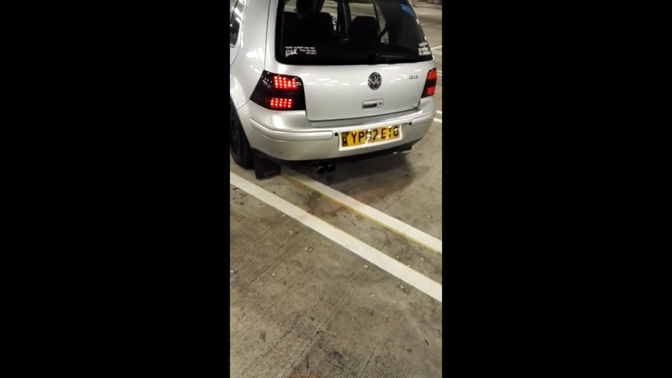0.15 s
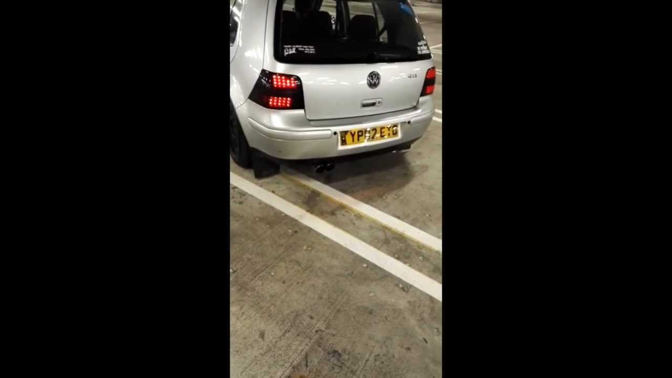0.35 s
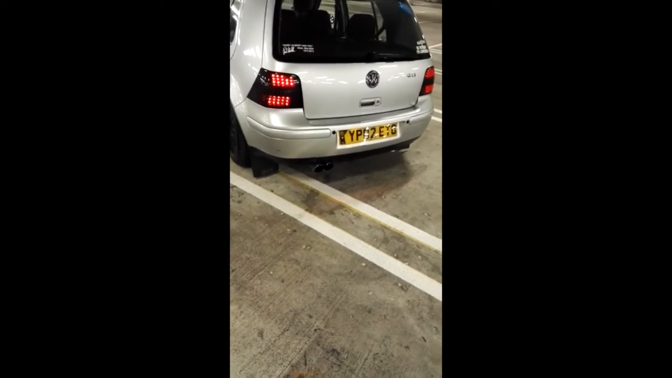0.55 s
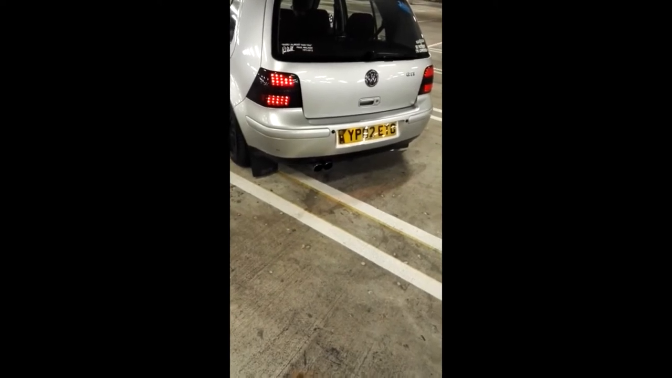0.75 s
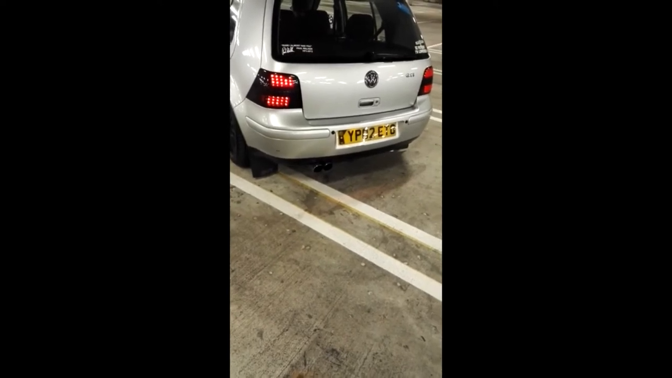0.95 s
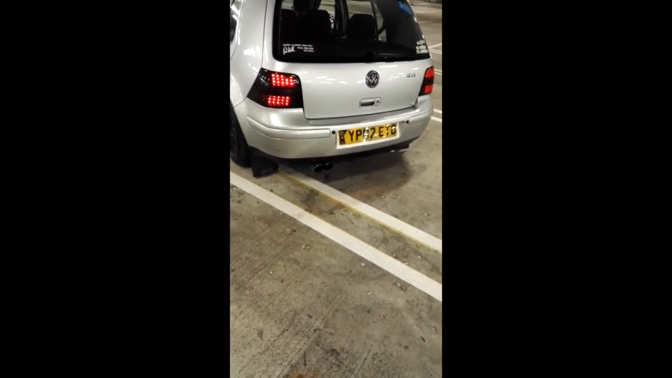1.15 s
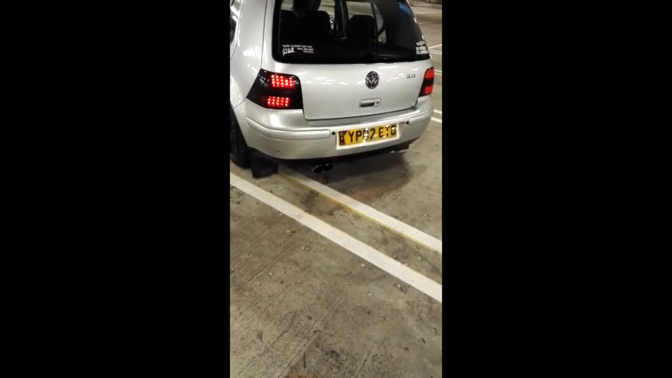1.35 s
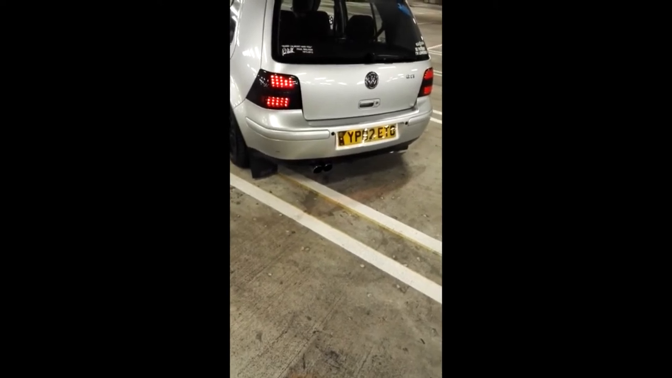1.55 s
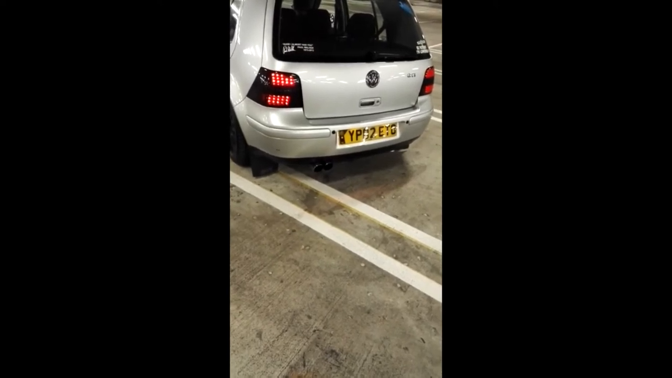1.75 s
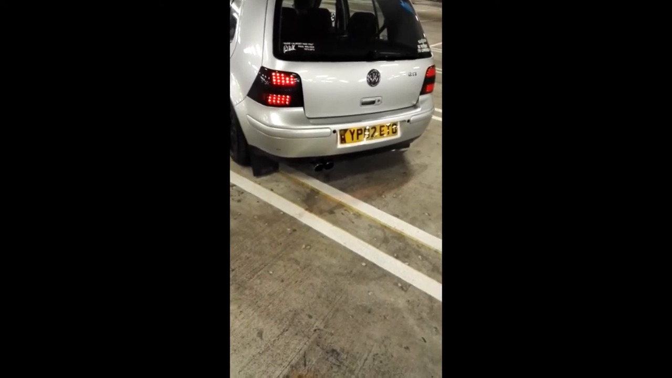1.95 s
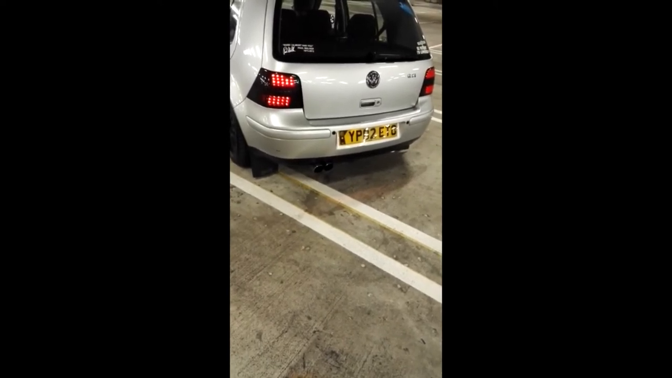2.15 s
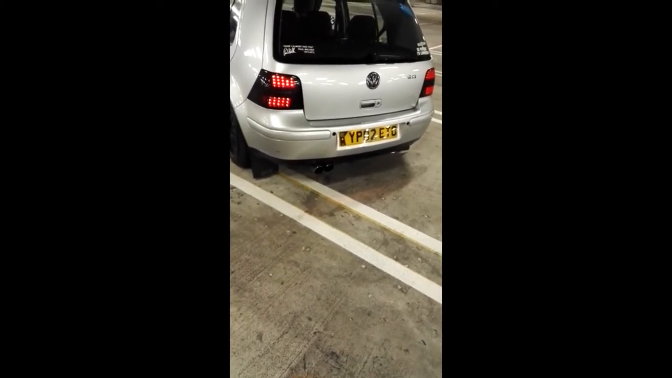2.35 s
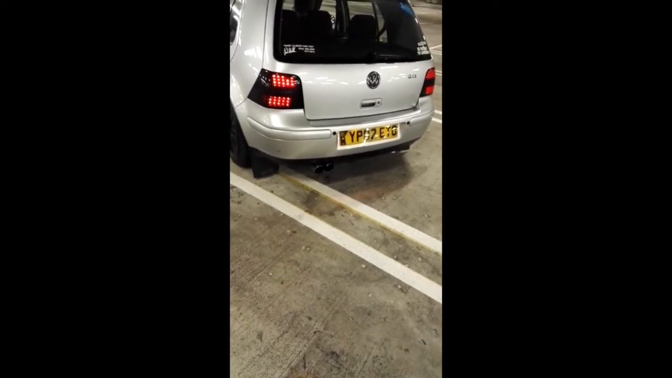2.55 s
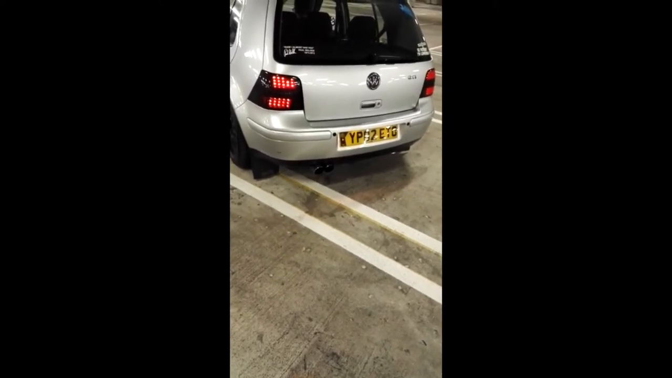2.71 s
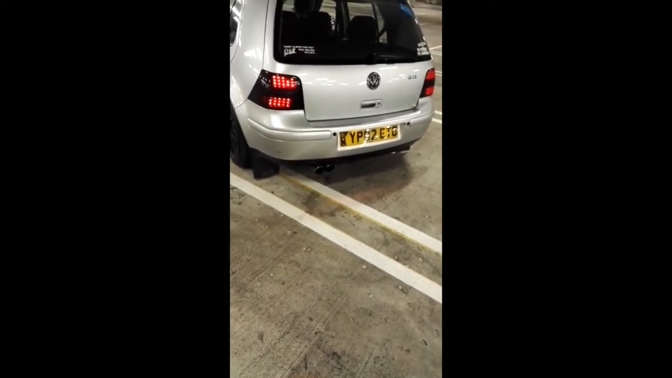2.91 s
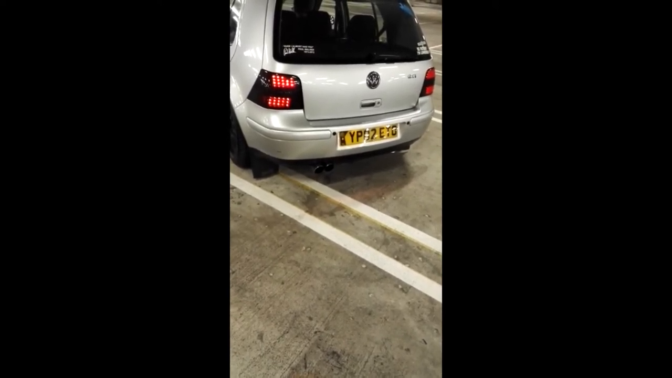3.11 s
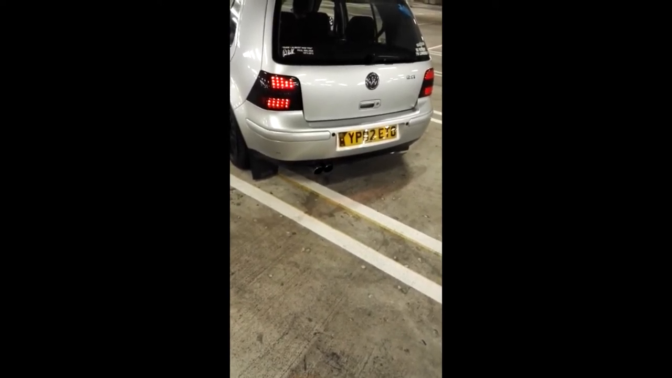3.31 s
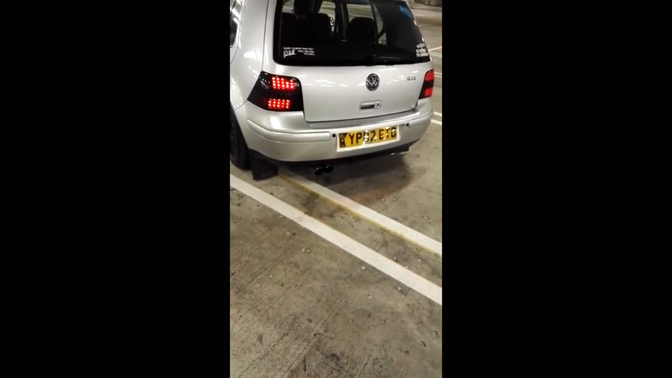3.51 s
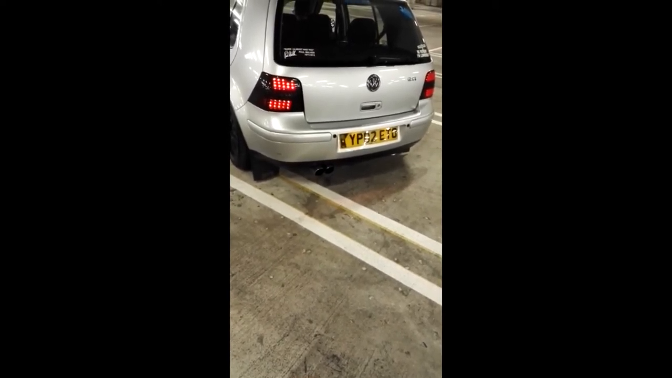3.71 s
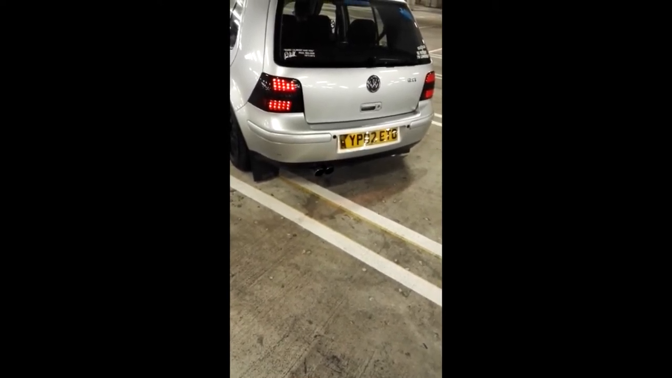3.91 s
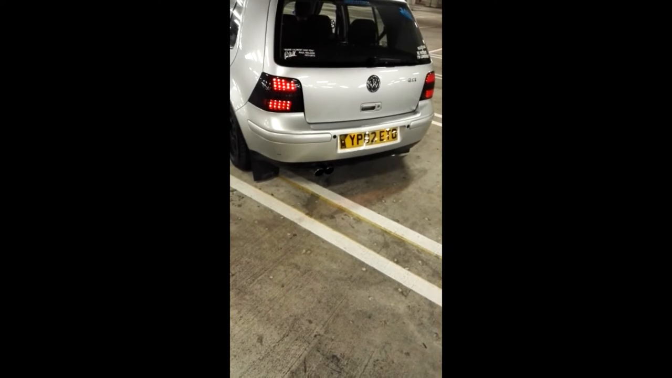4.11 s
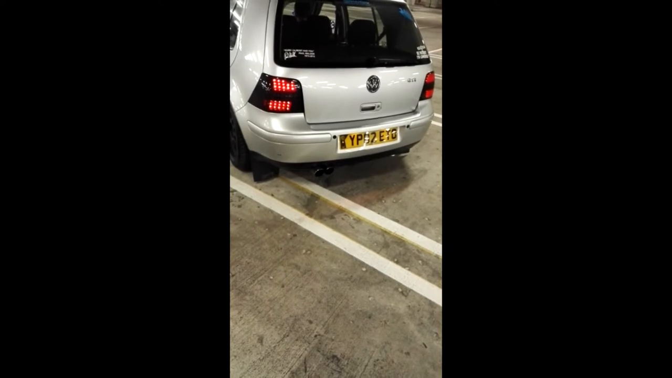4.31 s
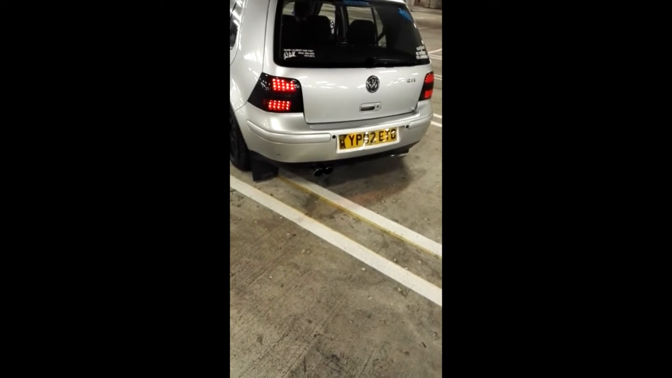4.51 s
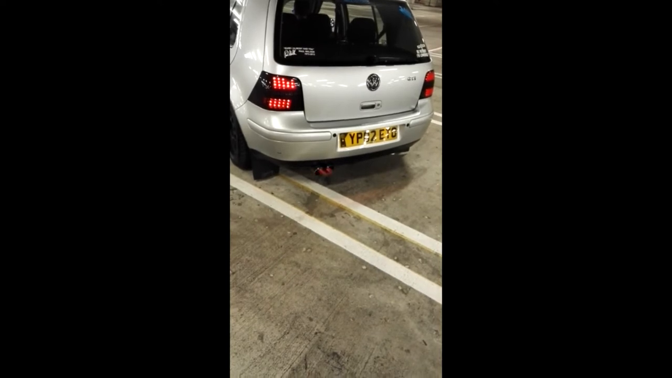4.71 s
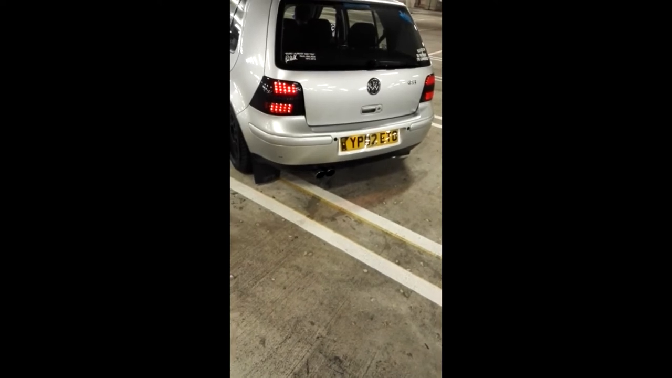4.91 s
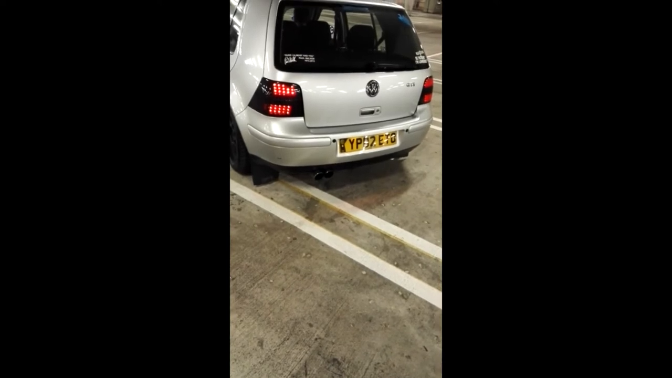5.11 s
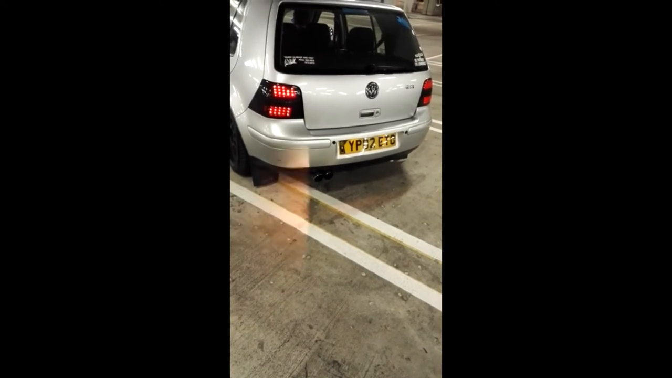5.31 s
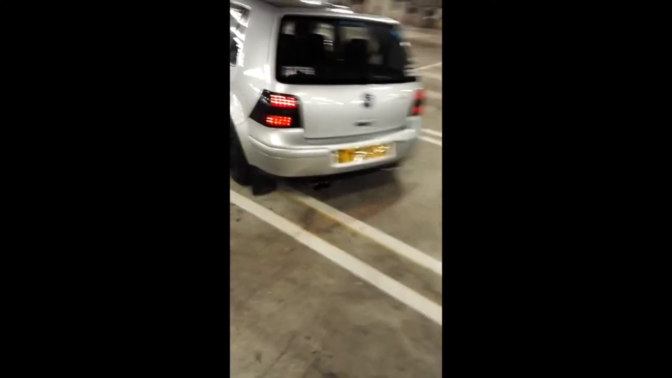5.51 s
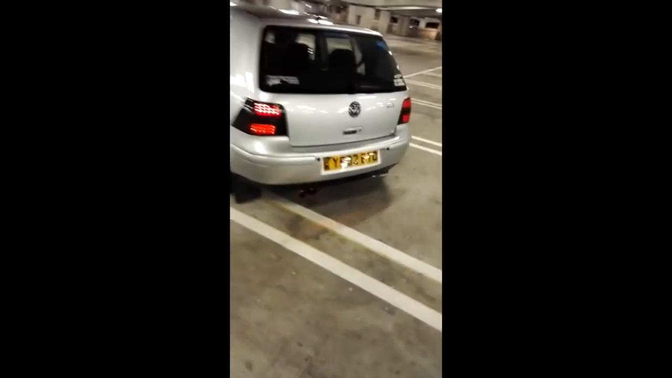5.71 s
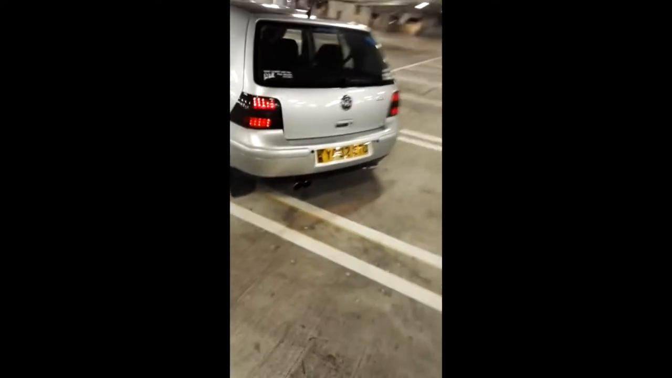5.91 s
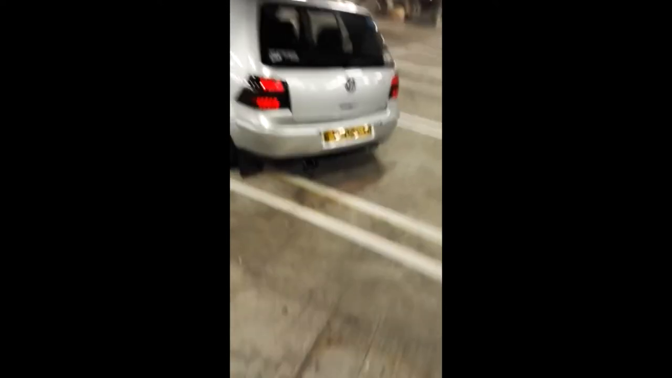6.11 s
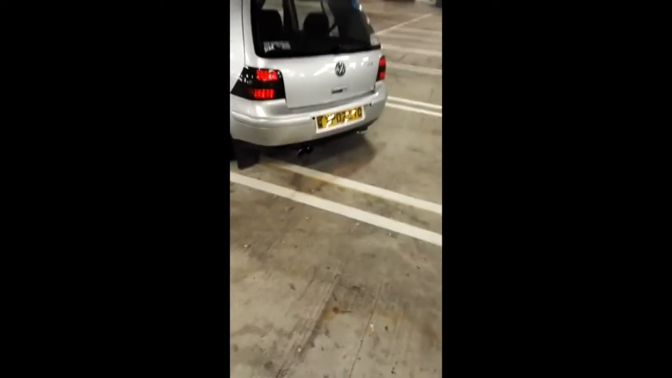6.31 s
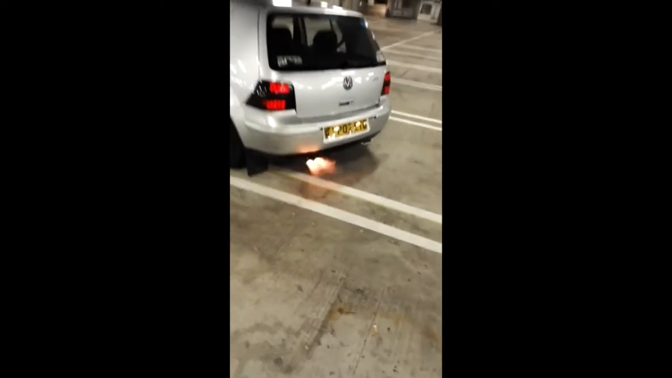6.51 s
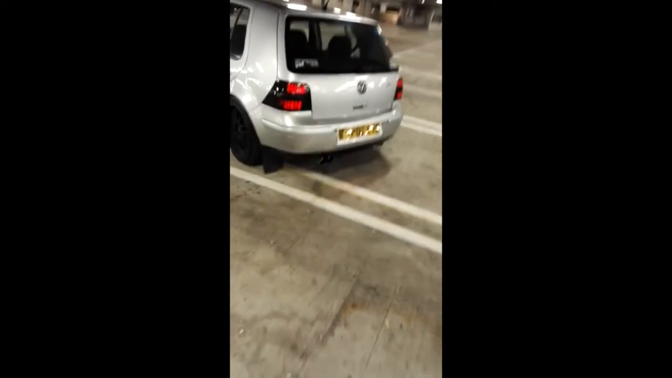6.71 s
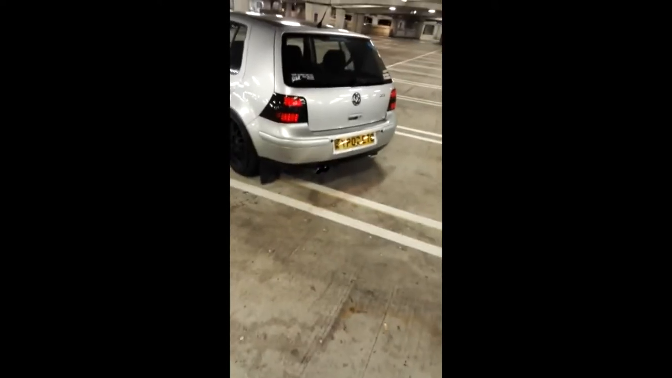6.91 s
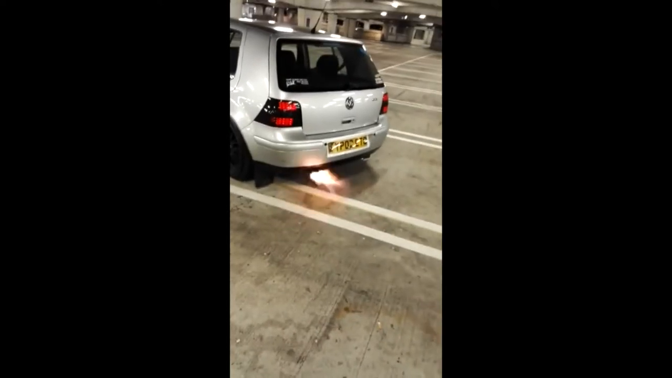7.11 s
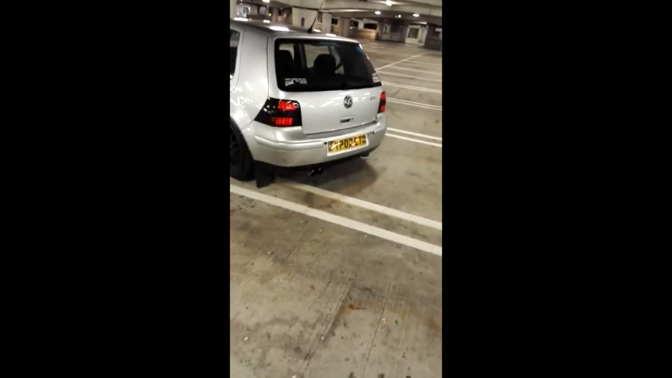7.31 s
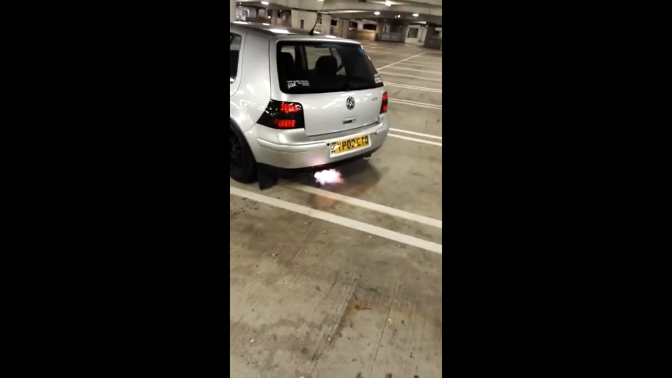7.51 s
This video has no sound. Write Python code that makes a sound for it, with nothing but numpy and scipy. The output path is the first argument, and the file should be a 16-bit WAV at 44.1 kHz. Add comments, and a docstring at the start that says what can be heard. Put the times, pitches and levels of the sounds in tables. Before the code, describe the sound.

Heard from close by in an echoing parking garage, a car engine climbs briefly and stutters at held revs for about four seconds, with a breathy turbo whistle and a few muffled pops. Then the engine drops back and the tailpipe fires sharp, crackling bangs: one alone, a rapid string, then two pairs. They distort the microphone and ring around the concrete walls while the engine surges weakly underneath.

```python
"""Launch limiter and backfires in a concrete car park.

A standing turbocharged four-cylinder car revs up against its launch limiter. Periodic firings make
the exhaust drone, and the limiter chops it into throbs, while turbulent gas roars and the turbo
whistles. Then the throttle closes and unburnt fuel explodes in the tailpipe: volleys of bangs
overload the microphone and reverberate round the hall."""
import sys
import numpy as np
from scipy import signal
from scipy.fft import rfft, irfft
from scipy.io import wavfile
from scipy.ndimage import uniform_filter1d

SR = 44100
rng = np.random.default_rng(int(sys.argv[2]) if len(sys.argv) > 2 else 0)


def waveform_to_disk(signal):
    """Save audio, clipped to [-1, 1], as 16-bit WAV at the path in sys.argv[1]."""
    frames = np.transpose(np.atleast_2d(signal))
    scaled = np.clip(frames, -1, 1) * 32767
    samples = np.round(scaled).astype(np.int16)
    wavfile.write(sys.argv[1], SR, samples)


N = 332980
TIME = np.arange(N) / SR
LIMITER_S, LIFT_S = 0.71, 4.7  # the limiter cuts in; the foot comes off the throttle

# Bursts in which the limiter lets the cylinders fire. Each row: start in seconds, length in seconds.
BURSTS = [(0.804, 0.055), (.896, 0.043), (0.988, 0.038), (1.096, .05), (1.249, .04), (1.327, 0.057),
          (1.521, 0.046), (1.704, .038), (1.899, 0.048), (2.085, 0.061), (2.187, 0.039), (2.275, 0.058),
          (2.365, .06), (2.49, 0.069), (2.607, 0.055), (2.695, 0.066), (2.815, 0.059), (2.933, 0.066),
          (3.051, 0.041), (3.135, 0.064), (3.26, 0.053), (3.351, 0.047), (3.456, 0.068), (3.572, .072),
          (3.667, 0.05), (3.783, 0.062), (3.897, .076), (3.994, .03), (4.048, 0.057), (4.132, 0.055),
          (4.216, .056), (4.285, 0.047), (4.411, 0.051), (4.514, .038), (4.634, 0.058)]
# Engine load, which drives drone, roar, hiss and turbo. Each row: time in seconds, load in dB.
ENGINE_LOAD = [(0, -3.5), (.8, 0), (1.3, -0.5), (1.87, -2.5), (2.35, 0), (2.53, -1.7), (2.88, -0.7),
               (3.15, -3), (3.65, -3.5), (4.17, -3.5), (4.5, -5)]
# Pitch of the turbo. Each row: time in seconds, whistle frequency in Hz.
TURBO_PITCH = [(0, 6550), (.35, 7000), (.75, 7300), (1.4, 8200), (2.05, 7060), (2.34, 9600), (2.7, 10300),
               (4.2, 10900)]
# The engine hunts after the lift. Each row: time in seconds, top firing rate in Hz, drone level in dB.
ENGINE_SURGES = [(4.83, 134, -21.5), (5.298, 138, -25), (6.421, 134, -29), (7.2, 136, -38)]
# Explosions in the tailpipe. Each row: start in seconds, crack in dB, burn time in seconds, boom in dB.
EXPLOSIONS = [(4.7834, -4.5, 0.037, -8.5), (5.4148, -4.5, 0.036, -18), (5.519, -13.5, 0.031, -43),
              (5.568, -13.5, 0.013, -33), (5.619, -12, .011, -23), (5.6921, -12, 0.021, -36),
              (5.759, -11.5, 0.029, -25), (6.4849, -12, 0.05, -37), (6.6041, -12.5, 0.06, -43),
              (7.2091, -11.5, 0.052, -31), (7.28, -22, 0.018, -31)]


def exhaust(turns, level, gate):
    """Periodic firings radiate a harmonic series; their unequal strengths add rumble and hum."""
    # Overtones. Each row: multiple of the firing rate, relative dB on the run-up and on the limiter.
    orders = [(.5, -32, -28), (1.5, -18, -18), (2, -15.5, -25), (2.5, -17.5, -29), (3, -23.5, -39),
              (4, -28.5, -38), (5, -27.5, -35.5), (6, -32.5, -37), (6.5, -33, -38), (7, -39, -45),
              (9.5, -32, -50.5), (10, -44, -40.5)]
    # Spectrum of the uneven firings. Each row: frequency in Hz, level in dB.
    rumble_spectrum = [(20, -12), (45, -12.5), (80, 6.5), (110, 9.5), (160, -1), (230, -3.5), (285, -10),
                       (400, -22), (700, -25), (2000, -74)]
    # A resonance that swells an overtone sweeping through it: centre in Hz, width in Hz, lift in dB.
    bark = (632, 30, 8)
    limiting, firing_hz = on_limiter(), engine_speed()
    # the faster the limiter chops, the more uneven the firings
    uneven_db = limiting * 12 * (np.minimum(uniform_filter1d(gate, size=6000), .55) - .55)
    # the walls carry the overtones on through the cuts
    carried = uniform_filter1d(level, size=5000) * gain_of(uneven_db)
    tone = level * np.sin(2 * np.pi * turns) * np.ones((2, 1))
    for order, free_db, limited_db in orders:
        # reflections part the phases of the two sides more as the pitch rises
        phase = rng.random() + 0.026 * order * rng.standard_normal((2, 1)) + 0.12 * wobble(18)
        db = free_db + limiting * (limited_db - free_db) + 2.8 * wobble(14)
        db += peak_db(order * firing_hz, *bark)
        tone += carried * gain_of(db) * np.sin(2 * np.pi * (order * turns + phase))
    firings = (np.diff(np.floor(turns), prepend=0) > 0) * rng.standard_normal(N)
    colour = gain_of(spectrum_at(rumble_spectrum, np.fft.rfftfreq(N, 1 / SR)))
    rumble = level * gain_of(-21.5 + limiting * (6 + 2 * gate)) * unit_rms(irfft(rfft(firings) * colour))
    hum = carried * gain_of(-18 - 9.2 * limiting) * narrow_band(firings, hz=283, width_hz=29)
    return np.sqrt(2) * tone + rumble + hum


def limiter(ramp_s=.016, dip_s=0.0095, dip_db=-5):
    """Interrupted firing modulates the amplitude. Returns the burst gate (0-1) and the drone envelope."""
    # Drone on the run-up. Each row: time in seconds, level in dB.
    run_up = [(.28, -17), (.38, -21), (.45, -15.5), (.52, -20.5), (.62, -15.5), (.78, -12.5)]
    gate = sum(np.clip(np.minimum(TIME - s, s + length - TIME) / ramp_s + .5, 0, 1)
               for s, length in BURSTS)
    burst_db = -8 + 1.04 * follow(ENGINE_LOAD)
    # a cut is deeper among crowded bursts, and deepest just before the cylinders fire again
    duty = uniform_filter1d(gate, size=12000)
    about_to_fire = np.interp(TIME + dip_s, TIME, gate)
    cut_db = burst_db - 4.5 - 4 * duty + dip_db * about_to_fire
    base_db = np.select([TIME < BURSTS[0][0], TIME < LIFT_S], [follow(run_up), cut_db], coasting_db())
    level = gain_of(base_db) + gate * (gain_of(burst_db) - gain_of(base_db))
    return uniform_filter1d(gate, size=200), uniform_filter1d(level, size=200)


def crank(gate, swing=.022, lag_cycles=.055, inertia_s=.06):
    """Phase, counted in firings, is the integral of a rate that rises in bursts and sags in cuts."""
    gained = signal.lfilter([1], [1, -np.exp(-1 / (inertia_s * SR))], gate) / (0.028 * SR)
    ripple = gained - uniform_filter1d(gained, size=9000)
    hz = engine_speed() * (1 + swing * ripple + .004 * wobble(50))
    return np.cumsum(hz) / SR - lag_cycles * gate  # fired pulses arrive later than unfired ones


def engine_speed(start_hz=113.3, limit_hz=132.83, climb_s=.8, lowest_hz=123):
    """The firing rate sets the fundamental: it eases up to the limit, then hunts after the lift."""
    held = limit_hz - (limit_hz - start_hz) * np.maximum(1 - TIME / climb_s, 0) ** 1.3
    times, top_hz, _ = np.transpose(ENGINE_SURGES)
    hunting = surge_curve(times, top_hz, rise_per_s=95, sag_per_s=30, floor=lowest_hz)
    return np.where(TIME < times[0], held, hunting)


def coasting_db(choke_db=-14, choke_s=.3):
    """Envelope of the drone after the lift: surges swell it, and bangs in close succession choke it."""
    times, _, top_db = np.transpose(ENGINE_SURGES)
    swell_db = surge_curve(times, top_db, rise_per_s=77, sag_per_s=29, floor=-33)
    choked = sum((TIME > s) * np.exp(-np.abs(TIME - s) / choke_s) for s, *_ in EXPLOSIONS)
    return swell_db + choke_db * np.clip(choked - 1, 0, 1)


def surge_curve(times, tops, rise_per_s, sag_per_s, floor):
    """Hunting is a slow oscillation: a quick linear rise to each top, then a gentler sag."""
    past = TIME - times[:, None]
    peaks = tops[:, None] - np.maximum(sag_per_s * past, -rise_per_s * past)
    return np.maximum(peaks.max(0), floor)


def on_limiter(fade_s=0.29):
    """Linear transition between regimes: 0 on the run-up, 1 on the limiter."""
    return np.clip((TIME - LIMITER_S) / fade_s + .5, 0, 1)


def backfires(refill_s=0.2, punch_s=0.04, body_rise_s=0.018, body_t60=0.49, boom_s=0.035):
    """Sudden combustion radiates a shock, a crackling flame, a hollow body and a boom; the hall echoes."""
    # Spectra of the flame's crack, the body and the boom. Each row: frequency in Hz, level in dB.
    crack_spectrum = [(30, -2.5), (200, -1), (700, -0.5), (1500, 1), (3000, 1.5), (6000, -2), (8500, -2),
                      (11000, -0.5), (13000, -1), (14500, -16.5)]
    body_spectrum = [(30, -17), (100, -26), (280, -4.5), (450, 3.5), (650, -1.5), (900, 1), (1100, -2),
                     (1400, -1), (2000, -2), (3300, -3.5), (5000, -15), (8000, -8.5), (14000, -15)]
    boom_spectrum = [(25, 0), (60, -15), (130, 0.5), (200, -3), (290, -3), (400, -7), (550, -14),
                     (900, -26), (4000, -60)]
    out, t = np.zeros((2, N)), TIME[:SR]
    waits = np.diff([row[0] for row in EXPLOSIONS], prepend=0)
    for (s, crack_db, burn_s, boom_db), wait_s in zip(EXPLOSIONS, waits):
        ring = 0.71 + 2.9 * gain_of(boom_db)  # a heavier boom rings the tailpipe harder
        after_burn = np.maximum(t - burn_s, 0)
        flame_db = 3 * np.exp(-t / punch_s) - 35 * t - 60 * after_burn / 0.45 - .7
        crackling = turbulence(crack_spectrum, SR, pipe=ring) * gain_of(flame_db + 1.5 * wobble(503)[:SR])
        body_db = -14 - 10.5 * np.exp(-wait_s / refill_s)  # fuel collects in the pipe between bangs
        decay_db = -60 * np.maximum(after_burn - .015, 0) / body_t60
        body = turbulence(body_spectrum, SR, pipe=ring) * gain_of(body_db + decay_db)
        body *= 1 - np.exp(-t / body_rise_s)
        boom = gain_of(boom_db) * turbulence(boom_spectrum, SR, pipe=0.9) * swell(t, boom_s)
        crack = gain_of(crack_db) * (crackling + gain_of(5) * shock(SR))
        add(out, s, near_reflections(crack + body + boom))
        # the echo grows with the crack, and by 4 dB per doubling of the burn time
        hall_db = -13 + 0.33 * crack_db + 4 * np.log2(burn_s / 0.053)
        add(out, s, gain_of(hall_db) * hall())
    return out


def shock(size, width_s=0.00045, spread_s=0.061, count=14):
    """A blast wave, compression then rarefaction, and its reflections off floor, ceiling and pillars."""
    t, taps = TIME[:600], np.zeros((2, size))
    front = (1 - t / width_s) * np.exp(-t / width_s)
    path_s = np.append(0, rng.uniform(0.0017, spread_s, count))
    arrival_s = path_s + rng.uniform(0, 0.00061, (2, count + 1))  # each side has its own delay
    strength = np.exp(-arrival_s / spread_s) * np.append(1, rng.uniform(.3, 1, count))
    np.put_along_axis(taps, (arrival_s * SR).astype(int), strength, axis=1)
    return signal.fftconvolve(taps, front[None], axes=1)[:, :size]


def gas_rush(turns, gate):
    """Turbulent outflow roars and hisses, pulsing with firings and bursts; it fades as the bangs start."""
    # Spectra of the roar and the hiss. Each row: frequency in Hz, level in dB.
    roar_spectrum = [(180, -37), (300, -2.5), (340, -5.5), (362, -10.5), (426, -3), (495, -7), (678, -10),
                     (1130, -14.5), (1670, -15.5), (1940, -14.5), (6000, -30.5), (7800, -33), (13200, -120)]
    hiss_spectrum = [(2500, -5.5), (4000, -5), (4800, -12), (6000, -8.5), (8500, -6), (11000, -3.5),
                     (12500, -8), (14500, -11.5)]
    # Metallic tones in the roar. Each row: frequency in Hz, half-width in Hz, relative level in dB.
    rings = [(1255, 21, -17), (1710, 24, -11.5)]
    load_db = follow(ENGINE_LOAD)
    gust = uniform_filter1d(np.roll(gate, round(0.022 * SR)), size=900) - .4  # trails each burst
    roar = turbulence(roar_spectrum, N, pipe=0.52)
    for hz, half_width, db in rings:
        ring_db = db + 2.7 * gust - 6.6 * np.maximum(1.2 - TIME, 0)
        roar += gain_of(ring_db) * narrow_band(rng.standard_normal((2, N)), hz, 2 * half_width)
    hiss = turbulence(hiss_spectrum, N)
    hiss_db = -37.5 + 1.2 * load_db + 1.5 * gust + 1.04 * wobble(80)
    roar_db = -34.5 + 0.92 * load_db + 0.94 * gust + 0.73 * wobble(60)
    roar_db += 2 * (1 - on_limiter())  # louder while every cylinder fires
    puffs = unit_rms(1 + 0.078 * np.cos(2 * np.pi * turns))
    fade = gain_of(np.interp(TIME, [4.75, 5.1], [0, -15]))
    return fade * puffs * (roar * gain_of(roar_db) + hiss * gain_of(hiss_db))


def turbo(gate, spool_hz_per_s=7000, spool_lag_s=.13):
    """A breathy whistle follows rotor speed, higher in each burst, louder under load and spooling up."""
    hz = follow(TURBO_PITCH)
    spooling = np.maximum(uniform_filter1d(np.gradient(hz, TIME), size=6000), 0) / spool_hz_per_s
    db = -47.5 + 1.7 * follow(ENGINE_LOAD) + 6 * np.interp(TIME - spool_lag_s, TIME, spooling)
    # random frequency modulation widens the tone as the speed rises
    spread = .009 + 0.066 * on_limiter() * np.log2(hz / hz[0])
    centre_hz = hz * (1 + 0.02 * gate + spread * wobble(2500))
    breath = resonate(rng.standard_normal((2, N)), centre_hz, width_hz=490)
    whistle = unit_rms(resonate(breath, centre_hz, width_hz=300))
    return whistle * gain_of(db + 2.6 * gate - 40 * np.maximum(TIME - 4.8, 0))


def turbo_chirps(lead_s=0.01, swell_s=0.019, width_hz=1100, toward_hz=9850, spun_up_hz=10100):
    """Boost peaks at the end of each burst, giving a Gaussian pulse of narrow-band hiss."""
    out, t = np.zeros((2, N)), TIME[:SR // 5] - 0.1
    envelope = np.exp(-(t / swell_s) ** 2)
    for start, length in BURSTS:
        s = start + length - lead_s
        whistle_hz = np.interp(s, *np.transpose(TURBO_PITCH))
        load_db = np.interp(s, *np.transpose(ENGINE_LOAD))
        hz = whistle_hz + 0.61 * (toward_hz - whistle_hz)
        # short bursts chirp hardest; the chirps fade once the turbo is spun up
        db = -28.5 + .7 * load_db - 260 * length - 0.02 * max(whistle_hz - spun_up_hz, 0)
        band = [(1, -90), (hz - 2 * width_hz, -36), (hz - width_hz / 2, -4), (hz, 0),
                (hz + width_hz / 2, -4), (hz + 2 * width_hz, -36), (SR, -60)]
        add(out, s + t[0], gain_of(db) * turbulence(band, len(t)) * envelope)
    return out


def silencer_pops(t60=0.26):
    """Small explosions deep in the silencer are heard as dull noise with an exponential decay."""
    # Muffled explosions. Each row: start in seconds, level in dB.
    pops = [(2.867, -29), (2.991, -30), (3.31, -29), (4.568, -27), (4.68, -20.5), (4.716, -22.5)]
    # Their spectrum. Each row: frequency in Hz, level in dB.
    pop_spectrum = [(40, -26), (120, 6.5), (350, -1), (700, -6.5), (1800, -23), (5000, -28.5), (11000, -26),
                    (15000, -36)]
    out, t = np.zeros((2, N)), TIME[:SR // 2]
    for s, db in pops:
        add(out, s, turbulence(pop_spectrum, len(t)) * gain_of(db - 60 * t / t60))
    return out


def howl(start_s=6.62, start_hz=642, rise_hz_per_s=820, glide_s=0.164, width_hz=90):
    """A noise-driven resonance and its octave glide upward, ringing hollow after the double bang."""
    out, t = np.zeros((2, N)), np.maximum(TIME - start_s, 0)
    hz = start_hz + rise_hz_per_s * np.minimum(t, glide_s)
    for multiple, db, peak_s in [(1, -19, 0.041), (2, -22, 0.04)]:
        ring = narrow_band(rng.standard_normal((2, N)), multiple * hz, width_hz)
        out += gain_of(db) * ring * swell(t, peak_s)
    return out


def near_reflections(x, spacing_hz=170):
    """Interference of near reflections, as random spectral ripple, makes each side's treble jagged."""
    size = x.shape[1]
    hz, knots = np.fft.rfftfreq(2 * size, 1 / SR), np.arange(0, SR / 2, spacing_hz)
    shared, left, right = (np.interp(hz, knots, row) for row in rng.standard_normal((3, len(knots))))
    depth_db = np.interp(hz, [700, 2000, 6000], [0, 3, 4])
    ripple = np.minimum(shared + .5 * np.array([left, right]), 1.4)
    response = gain_of(depth_db * (ripple - depth_db / 12))  # the offset roughly preserves the power
    return irfft(rfft(x, 2 * size) * response)[:, :size]


def hall(build_s=0.03, flutter_db=0.5):
    """Reverberation between concrete walls: the diffuse field builds up, then loses its treble first."""
    # Spectrum of the echo. Each row: frequency in Hz, level in dB.
    echo_spectrum = [(40, -24), (90, -7.5), (140, 1), (300, -1.5), (450, -4), (700, -0.5), (950, -3),
                     (1200, -6.5), (1800, -8), (3000, -11.5), (5000, -17), (8000, -15), (14000, -20)]
    # Reverberation time. Each row: frequency in Hz, time to fall 60 dB in seconds.
    decay_times = [(100, 3.5), (400, 6.8), (900, 5.6), (2000, 4), (4000, 2.33), (8000, 1.19), (14000, 0.79)]
    size = 3 * SR
    hz, t, frames = signal.stft(turbulence(echo_spectrum, size, pipe=0.3), SR, nperseg=512)
    decay = gain_of(-60 * t / spectrum_at(decay_times, hz)[:, None])
    _, tail = signal.istft(frames * decay, SR, nperseg=512)
    envelope = (1 - np.exp(-TIME / build_s)) * gain_of(flutter_db * wobble(45.6))
    return tail[:, :size] * envelope[:size]


def turbulence(spectrum, size, pipe=0):
    """Source and filter: partly coherent stereo noise, coloured and lifted by the tailpipe's modes."""
    # Likeness of the two sides. Each row: frequency in Hz, left-right correlation.
    coherence = [(30, .7), (60, .88), (130, .9), (290, .66), (640, .36), (1400, -.05), (3000, 0),
                 (7000, .55), (11000, .6), (14000, .5)]
    # Tailpipe resonances. Each row: frequency in Hz, width in Hz, lift in dB at pipe=1.
    pipe_modes = [(298, 15, 7.5), (432, 41, 3), (599, 37, 6), (827, 140, 5), (1540, 250, 4), (2560, 130, 4),
                  (2840, 79, 1), (4920, 100, 3.5)]
    hz = np.fft.rfftfreq(size, 1 / SR)
    mid, side = rfft(rng.standard_normal((2, size)))
    correlation = spectrum_at(coherence, hz)
    mid, side = mid * np.sqrt(1 + correlation), side * np.sqrt(1 - correlation)
    lift_db = sum(peak_db(hz, *mode) for mode in pipe_modes)
    colour = gain_of(spectrum_at(spectrum, hz) + pipe * lift_db)
    return unit_rms(irfft(np.array([mid + side, mid - side]) * colour, size))


def resonate(x, hz, width_hz):
    """A damped resonator of unit gain, whose centre frequency may vary in time."""
    carrier = np.exp(2j * np.pi * np.cumsum(hz * np.ones(N)) / SR)
    pole = np.exp(-np.pi * width_hz / SR)
    return 2 * (carrier * signal.lfilter([1 - pole], [1, -pole], x / carrier)).real


def narrow_band(x, hz, width_hz):
    """Two equal resonators in cascade give steeper skirts; the result has rms 1."""
    return unit_rms(resonate(resonate(x, hz, width_hz), hz, width_hz))


def peak_db(hz, centre_hz, width_hz, lift_db):
    """The bell-shaped lift of a resonance."""
    return lift_db / (1 + (2 * (hz - centre_hz) / width_hz) ** 2)


def swell(t, peak_s):
    """A squared critically damped pulse, reaching 1 at peak_s."""
    return (t / peak_s * np.exp(1 - t / peak_s)) ** 2


def wobble(per_s):
    """Random fluctuation of rms about 1, interpolated between per_s values a second."""
    knots = rng.standard_normal(N // 8)
    return np.interp(TIME * per_s, np.arange(len(knots)), knots) * np.sqrt(3 / 2)


def gain_of(db):
    """Decibels to amplitude."""
    return 10 ** (np.asarray(db) / 20)


def unit_rms(x):
    """Normalises to rms 1."""
    return x / np.sqrt(np.mean(x ** 2) + 1e-20)


def spectrum_at(points, hz):
    """Interpolates a table on a log-frequency axis."""
    f, value = np.transpose(points)
    return np.interp(np.log(hz + 1), np.log(f + 1), value)


def follow(curve):
    """Interpolates a time curve at every sample."""
    return np.interp(TIME, *np.transpose(curve))


def add(mix, s, sound):
    """Superposes a sound on the mix at s seconds."""
    part = mix[:, round(s * SR):][:, :sound.shape[-1]]
    part += sound[..., :part.shape[-1]]


def scene():
    """The sources superpose; a level difference sets exhaust and backfires slightly to the left."""
    gate, level = limiter()
    turns = crank(gate)
    drone = exhaust(turns, level, gate) * gain_of([[.55], [-.55]])
    engine = drone + gas_rush(turns, gate) + turbo(gate) + turbo_chirps()
    return engine + silencer_pops() + howl() + backfires() * gain_of([[.3], [-.3]])


def record(dry, lead_s=.000016, cutoff_hz=14400):
    """Two band-limited microphones, the left a little nearer, saturate on the bangs."""
    # Imbalance of the microphones. Each row: frequency in Hz, left minus right in dB.
    balance = [(130, 0), (700, 1), (2500, -1.6), (5000, -.6), (8500, -1), (13000, 1)]
    hz = np.fft.rfftfreq(N, 1 / SR)
    left = gain_of(spectrum_at(balance, hz) / 2) * np.exp(1j * np.pi * hz * lead_s)
    heard = irfft(rfft(dry) * np.array([left, 1 / left]), N)
    saturated = heard / (1 + heard ** 6) ** (1 / 6)
    lowpass = signal.firwin(255, cutoff_hz, window=("kaiser", 7), fs=SR)
    return np.clip(signal.oaconvolve(saturated, lowpass[None], "same"), -1, 1)


dry = scene()
out = record(dry)
waveform_to_disk(out)
```